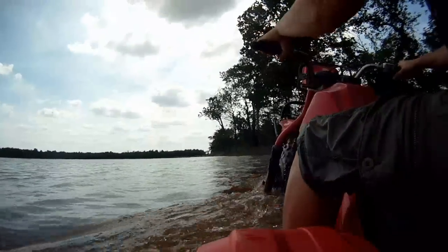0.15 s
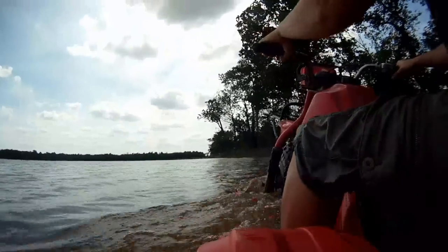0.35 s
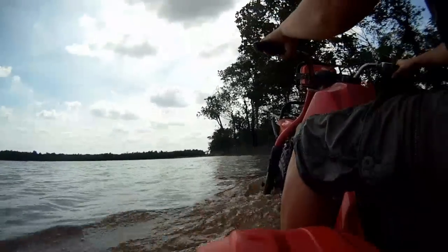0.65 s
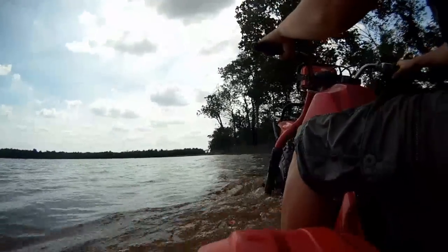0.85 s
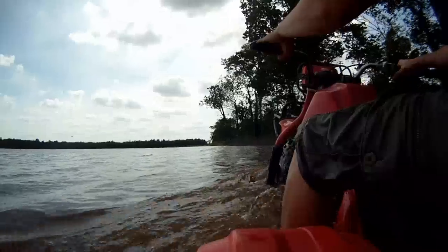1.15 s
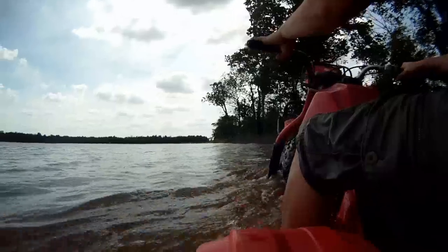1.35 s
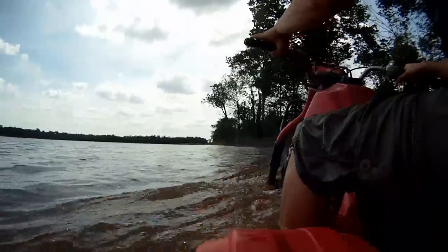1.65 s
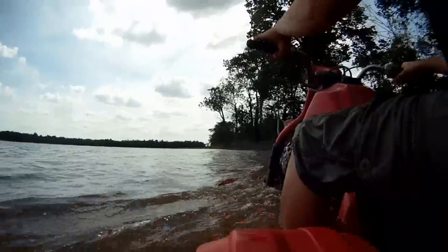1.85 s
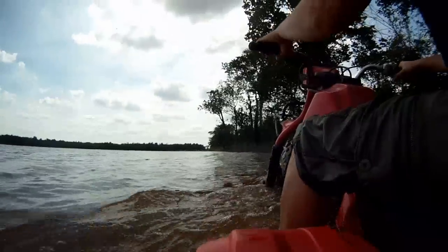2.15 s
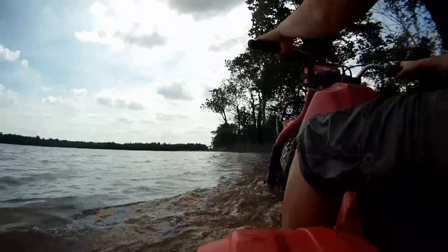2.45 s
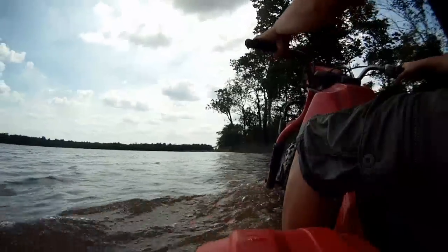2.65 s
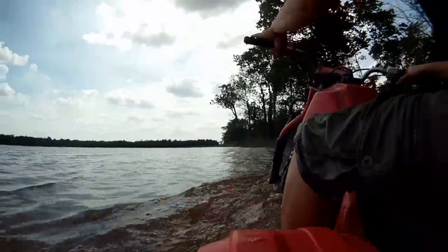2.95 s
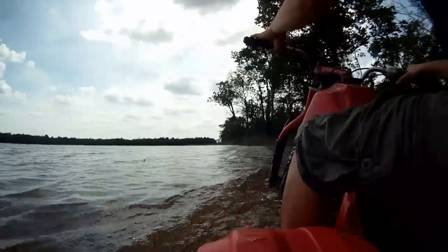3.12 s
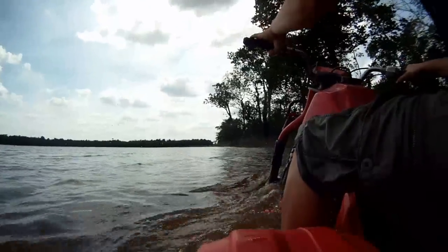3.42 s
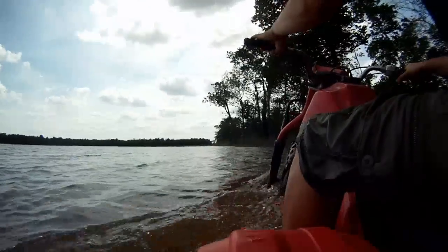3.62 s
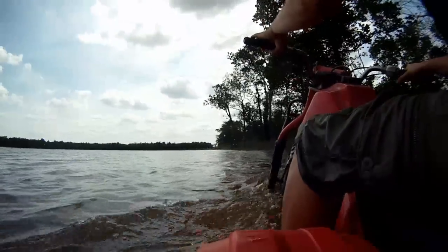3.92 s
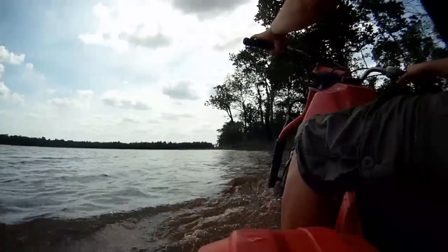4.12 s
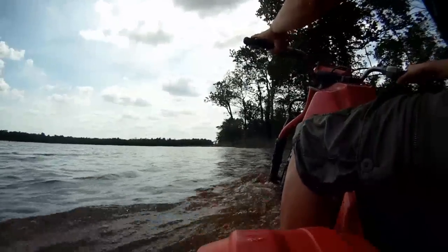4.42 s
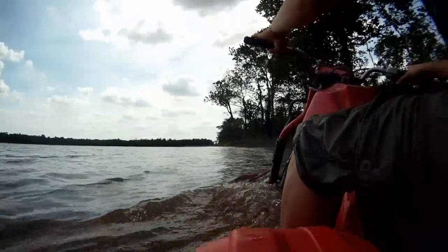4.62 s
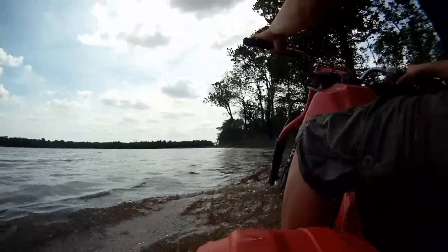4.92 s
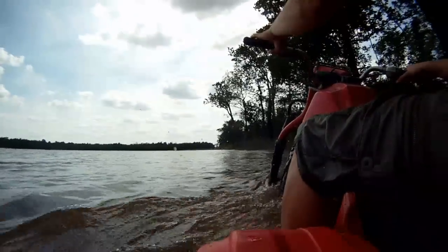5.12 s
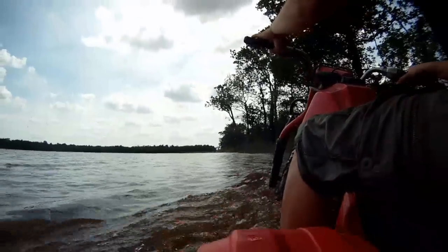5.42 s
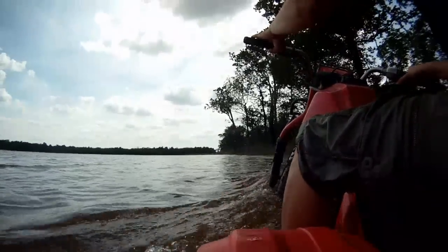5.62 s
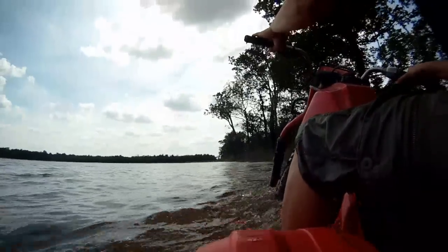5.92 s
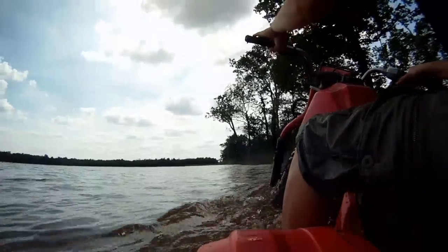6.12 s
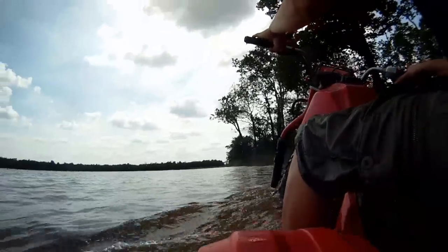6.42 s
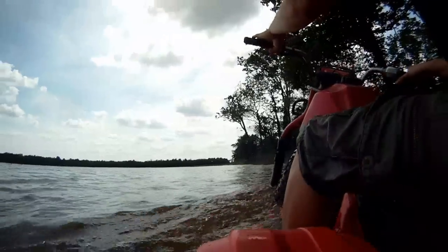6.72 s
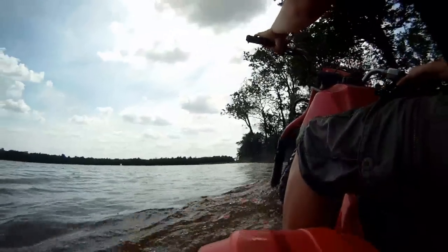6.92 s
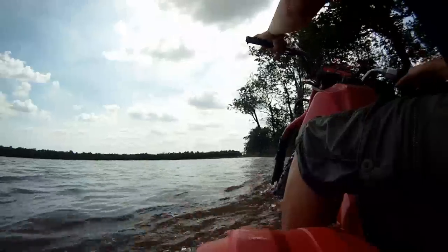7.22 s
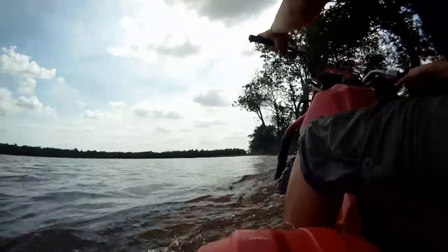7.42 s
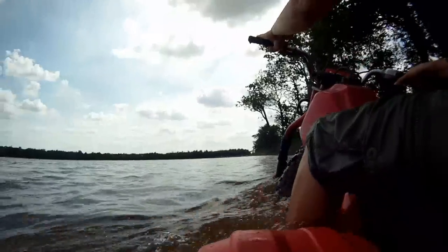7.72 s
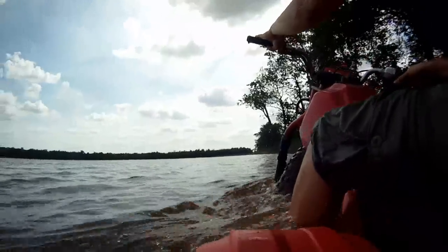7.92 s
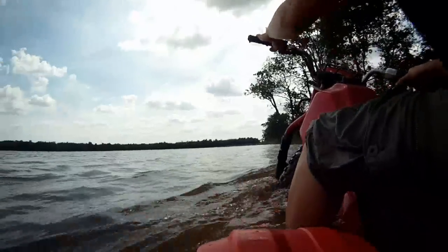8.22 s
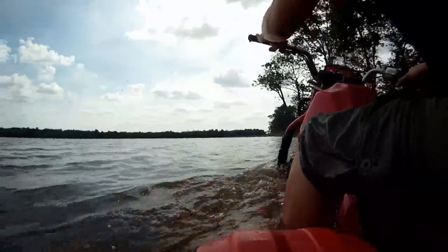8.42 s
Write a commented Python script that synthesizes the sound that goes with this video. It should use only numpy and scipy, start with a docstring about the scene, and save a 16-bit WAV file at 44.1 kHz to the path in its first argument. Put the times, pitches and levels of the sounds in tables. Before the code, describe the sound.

Close to the rear wheel of an all-terrain vehicle in open water, a small engine putters with a deep, gurgling exhaust. It runs fairly steadily, with short sags, chain rattles and a few light knocks. Softer bubbling, sloshing and a thin hiss of spray go on underneath. Towards the end the revs drop and the engine lugs, the water churns a little louder, and one sharp splat hits the fender.

```python
"""In deep water, at the rear fender of a wading three-wheeler. Its single-cylinder four-stroke engine
runs at low revs, stumbles now and then and lugs at the end. Periodic firing makes the exhaust throb,
meshing teeth whine, and impacts excite the modes of casing, crankcase and valve cover. Round the
wheels bubbles resonate, water hisses and drops patter. Coarse sampling adds a glassy fizz."""
import sys
import numpy as np
from scipy import signal
from scipy.fft import rfft, irfft, next_fast_len
from scipy.io import wavfile
from scipy.ndimage import uniform_filter1d, map_coordinates

SR = 44100
rng = np.random.default_rng(int(sys.argv[2]) if len(sys.argv) > 2 else 0)


def digitize_waveform(pressure):
    """Quantize a signal to 16-bit integers and store it at the path in sys.argv[1].

    Rows of a 2-D input are taken as channels; values are limited to [-1, 1].
    """
    field = np.atleast_2d(pressure).T
    bounded = np.clip(field, -1, 1)
    quanta = np.round(bounded * 32767).astype(np.int16)
    wavfile.write(sys.argv[1], SR, quanta)


N = 377496
TIME = np.arange(N) / SR

# Firing rate, one firing to an engine cycle: t/s, f/Hz
FIRING_RATE = [(0.0, 28.82), (0.15, 28.25), (0.36, 29.05), (0.5, 28.1), (0.62, 27.41), (0.9, 27.85),
               (1.25, 28.78), (1.5, 29.37), (1.75, 29.85), (1.95, 30.47), (2.15, 29.44), (2.42, 27.78),
               (2.72, 27.13), (2.9, 28.21), (3.03, 29.53), (3.15, 29.66), (3.35, 28.02), (3.62, 28.72),
               (4.0, 28.61), (4.15, 28.81), (4.35, 28.63), (4.55, 28.82), (4.9, 28.76), (5.1, 28.71),
               (5.45, 28.33), (5.75, 28.91), (5.95, 28.69), (6.25, 27.91), (6.55, 28.17), (6.8, 27.48),
               (7.05, 26.41), (7.35, 25.66), (7.6, 27.42), (7.75, 27.46), (8.0, 25.64), (8.2, 24.84),
               (8.38, 23.39), (8.56, 26.21)]
CRUISE_HZ, LUG_HZ = 28.5, 24.6  # the usual rate, and the rate below which the engine lugs
# Load of the water on the engine: t/s, level/dB
ENGINE_LOAD = [(0, -3.5), (1.9, -2), (2.45, -3.5), (3.25, 0), (4.3, 0), (5.4, -0.5), (6.2, -3.5),
               (7.5, -2.5), (8.56, -5)]
# Stumbles, in which the drone sags and the slack chain rattles: t/s, length/s, sag/dB, rattle/dB
STUMBLE_EVENTS = [(0.173, 0.17, 7, 4.5), (0.53, 0.078, 28.5, 1), (0.95, 0.23, 2, 2.5), (1.662, 0.09, 1, 4),
                  (2.39, 0.03, 12.5, 6.5), (2.738, 0.16, 19.5, 3.5), (2.93, 0.026, 10.5, -9.5),
                  (3.3, 0.3, 5.5, 3), (3.54, 0.082, 3, 3.5), (4.036, 0.081, 11.5, 2.5),
                  (4.225, 0.15, 10.5, 3), (5.03, 0.029, 4.5, 5.5), (5.47, 0.15, 8, 4),
                  (5.735, .1, 8.5, 2.5), (5.95, 0.037, 9.5, 3), (6.2, 0.13, 5, 3.5),
                  (6.32, 0.09, 18.5, 3.5), (6.7, 0.12, 3.5, 1.5), (6.887, 0.27, 4.5, 1.5),
                  (7.248, 0.54, 3, -0.4), (7.641, 0.07, 6, 2), (8.533, 0.1, 10, 7.5)]

# Gulp of each firing: order (multiple of the firing rate), level/dB
PUTTER_HARMONICS = [(3, -3), (6, -16)]
# Lugging boom: order, level/dB
BOOM_HARMONICS = [(5, 2), (9, -19)]
# Ringing of the pipe: order, level/dB
PIPE_HARMONICS = [(7, -12), (8, 1), (9, -17), (10, -16.5)]
# Envelope of that ringing at resonance: t/s, level/dB
PIPE_LEVEL = [(0, -34.5), (.25, -30), (.75, -31), (1.3, -31), (1.7, -28), (2.15, -31.5), (2.7, -32),
              (3.5, -29), (4.7, -30), (5.4, -27), (6.3, -31.5), (7.1, -33.5), (8.56, -29.5)]
# Brief dips in that ringing: t/s, length/s, depth/dB
PIPE_LEVEL_DIPS = [(.55, 0.11, 5), (.67, 0.037, 6), (1.95, 0.058, 8), (2.7, 0.16, 3), (3.14, .05, 5),
                   (4.77, 0.066, 29), (4.93, 0.058, 13), (5.82, 0.051, 9.5)]
MUFFLER_RESONANCE, PIPE_RESONANCE = (119.2, 5.5), (228, 11)  # f/Hz, bandwidth/Hz
# Spectrum of gas breaking through water: f/Hz, level/dB
BURBLE_SPECTRUM = [(12, -25), (28, 1.5), (60, -1), (125, 1.5), (170, -4), (240, -2.5), (300, -13.5),
                   (400, -26.5), (520, -24.5), (800, -37)]

# Response of the casing: f/Hz, level/dB
CASING_RESPONSE = [(300, -8), (520, -23.5), (585, -2), (690, -6.5), (745, -10), (880, 1), (1010, -7.5),
                   (1140, -18.5), (1350, -14.5), (1500, -24), (1680, -19.5), (1850, -29), (2600, -55)]
# Primary gear mesh and its neighbours: order, level/dB
MESH_TONES = [(41, -10.5), (42, 0), (43, -8.5), (46, -11), (47, -17.5), (48, -14.5), (59, -23), (63, -39),
              (67, -22)]
# Envelope of their whine: t/s, level/dB
WHINE_LEVEL = [(0, -45), (.65, -50), (1.0, -44.5), (1.55, -51), (2.0, -55), (2.3, -50), (2.65, -50),
               (2.98, -46.5), (3.12, -50), (3.3, -41), (4.3, -39.5), (5.4, -43), (5.8, -45.5), (6.55, -49),
               (7.1, -47), (7.6, -48), (8.56, -47)]
# Gearbox tones: order, level/dB
GEARBOX_TONES = [(11, -26.5), (12, -23.5), (13, -15), (15, -27.5), (16, -27.5), (27, -15), (30.1, -18),
                 (31.2, -3.5), (33, -12)]
# Envelope of the drive chain's hum: t/s, level/dB
CHAIN_LEVEL = [(0, -49), (.9, -42.5), (1.5, -43), (2.3, -45.5), (2.65, -39.5), (3.1, -39), (3.7, -42.5),
               (5.5, -43.5), (6, -45.5), (7.7, -44.5), (8.56, -49)]
# Piston slaps: phase/cycles, spread/cycles, level/dB
PISTON_IMPACTS = [(.24, .02, -1.5), (.34, .03, -5.5), (.545, .02, -1), (.61, .02, -4), (.74, .03, -2),
                  (.82, .025, 0), (.91, .02, -4)]
# Response of the crankcase: f/Hz, level/dB
CRANKCASE_RESPONSE = [(1200, -36), (1790, -25.5), (1910, 6), (2130, 6), (2350, -6), (2500, -6.5),
                      (2700, -33), (3200, -39), (4200, -60.5)]
# Tappet ticks: phase/cycles, spread/cycles, level/dB
VALVE_IMPACTS = [(.155, .014, -5.5), (.465, .025, -5.5), (.65, .024, 0), (.98, .04, -8)]
# Response of the valve cover: f/Hz, level/dB
COVER_RESPONSE = [(1500, -13.5), (2700, 5.5), (3200, -3.5), (3750, 15.5), (4150, 1), (4550, 11),
                  (5250, -2.5), (6000, -42.5)]
# Slaps of the slack cam chain: phase/cycles, spread/cycles, level/dB
CAM_CHAIN_IMPACTS = [(.46, .03, -2.5), (.97, .028, 0)]
# Response of the cam chain's tunnel: f/Hz, level/dB
TUNNEL_RESPONSE = [(1500, -14), (2400, 1), (3000, -5.5), (3600, 6.5), (4600, -3), (5300, -9.5),
                   (6000, -29.5)]
# Brief peaks in the clatter, a few of them sharp knocks: t/s, casing/dB, crankcase/dB, valve cover/dB
CLATTER_PEAKS = [(1.0161, -36, -36, -41), (1.3215, -22, -38, -48), (4.2705, -23, -31, -46),
                 (5.031, -21, -38, -48), (6.6003, -34, -27, -39), (7.1826, -21, -31, -44),
                 (7.5362, -34, -30.5, -50), (7.9055, -36, -37, -38), (7.9439, -38, -40, -37),
                 (8.1365, -30, -32, -38), (8.3005, -30, -26.5, -37)]
# Spell of piston knock under strain: t/s, length/s, level/dB
LABOUR_SPELLS = [(7.1, .7, -48)]

# Envelope of the bow wave breaking round the wheels: t/s, level/dB
WAKE_LEVEL = [(0, -41), (.6, -40.5), (1.3, -46.5), (2.2, -42), (2.75, -41), (3.35, -47), (4, -39.5),
              (5.4, -43), (6.2, -45.5), (7.2, -36), (7.55, -44), (8.1, -35.5), (8.56, -37)]
# Spectrum of the water's hiss: f/Hz, level/dB
WASH_SPECTRUM = [(300, 23.5), (900, -1.5), (1500, 7), (2600, -14), (4000, -8.5), (5500, -13.5),
                 (6500, -23.5)]
# Spectrum of fine drops landing: f/Hz, level/dB
SPRAY_SPECTRUM = [(1200, 2), (2500, 10), (3500, 3.5), (4800, -7), (5600, -20.5)]
# Spurts of spray off the tyres: t/s, length/s, level/dB
TYRE_SPURTS = [(.28, .08, -54), (.656, .015, -49), (.695, .02, -48.5), (2.89, .02, -49),
               (3.337, .025, -49.5), (6.72, .1, -54), (7.489, .03, -50), (7.615, .025, -48.5),
               (8.06, .02, -50), (8.179, .02, -49)]
# Spectrum of a spurt: f/Hz, level/dB
SPURT_SPECTRUM = [(1500, -7), (2600, -4), (3700, 0), (4800, 0), (5400, -4.5), (6000, -28)]
# Waves sloshing round the wheels: t/s, length/s, level/dB
SLOSH_EVENTS = [(0.595, 0.11, -31.5), (1.35, 0.086, -36.5), (2.036, 0.071, -35.5), (2.714, 0.074, -30),
                (3.08, 0.093, -37), (3.342, 0.08, -31.5), (3.496, 0.038, -31), (3.844, 0.13, -38),
                (5.156, 0.062, -38.5), (5.399, 0.14, -31.5), (6.938, 0.036, -29), (7.662, .11, -34.5)]
# Water thrown against the fender, a smack and its rebound: t/s, level/dB, f/Hz of its ring
FENDER_SPLATS = [(7.5303, -22.5, 3390), (7.5331, -39, 2470)]
# Modes of the fender: f/Hz, level/dB
FENDER_MODES = [(1375, -11), (1640, -10), (1920, -8), (2150, -6), (2470, -11), (2780, -14), (3020, -16)]


def amp(db):
    """Amplitude ratio of a level in decibels."""
    return 10 ** (np.asarray(db) / 20)


def unit_rms(x):
    """Normalises a signal to rms 1."""
    return x / np.sqrt(np.mean(x ** 2) + 1e-20)


def curve(rows):
    """Linear interpolation of (t/s, value) rows at every sample."""
    return np.interp(TIME, *np.transpose(rows))


def bump(s, length):
    """Gaussian pulse centred on time s; length is its full width at 1/e."""
    return np.exp(-np.minimum((2 * (TIME - s) / length) ** 2, 20))


def bumps_db(rows):
    """Sum of Gaussian pulses in decibels, for each level column of (t/s, length/s, level/dB, ...)."""
    return sum(np.outer(dbs, bump(s, length)) for s, length, *dbs in rows)


def swells(rows):
    """Amplitude envelope of Gaussian pulses, from (t/s, length/s, level/dB) rows."""
    return sum(amp(db) * bump(s, length) for s, length, db in rows)


def wander(rate):
    """Smooth random modulation of rms 1, changing about rate times a second."""
    knots = rng.standard_normal(4096)
    coarse = TIME[::32]
    spline = map_coordinates(knots, [coarse * rate], order=3, mode="wrap")
    return unit_rms(np.interp(TIME, coarse, spline))


def per_cycle(cycles):
    """Cycle-to-cycle variation: one random value a cycle, gliding to the next."""
    return np.interp(cycles, np.arange(512), rng.standard_normal(512))


def cyclic_noise(cycles):
    """Periodic noise: one random waveform repeats with every engine cycle."""
    return np.interp(cycles % 1, np.linspace(0, 1, 512), rng.standard_normal(512))


def grit(per_s):
    """Shot noise: tiny impacts of random size at random moments."""
    return unit_rms(rng.standard_normal(N) * (rng.random(N) < per_s / SR))


def bursts(cycles, impacts, steady_db, uneven_db):
    """Envelope of Gaussian bursts in every cycle over a steady floor; incoherent parts add in power."""
    power = amp(steady_db) ** 2
    for phase, spread, db in impacts:
        away = (cycles - phase + .5) % 1 - .5
        strength = amp(db + uneven_db * per_cycle(cycles))
        power = power + strength ** 2 * np.exp(-.5 * (away / spread) ** 2)
    return np.sqrt(power)


def blows(cycles, impacts, uneven_db):
    """Impulse train at set phases of every cycle, with random timing and strength."""
    force = np.zeros(N)
    starts = np.arange(256)
    for phase, spread, db in impacts:
        late, hard = rng.standard_normal((2, len(starts)))
        at = np.searchsorted(cycles, starts + phase + spread * late)
        heard = (at > 0) & (at < N)
        force[at[heard]] += amp(db + uneven_db * np.tanh(hard[heard]))
    return unit_rms(force)


def gulps(cycles, harmonics, phase, waver_db):
    """Fourier synthesis of a pressure dip at one phase of every cycle; each harmonic wavers."""
    angle = 2 * np.pi * (cycles - phase)
    partials = (amp(db + waver_db * wander(15)) * np.cos(order * angle) for order, db in harmonics)
    return -np.sqrt(2) * sum(partials)


def resonance_db(hz, resonance):
    """Lorentzian response of a resonator, 0 dB at its centre."""
    centre, width = resonance
    return -10 * np.log10(1 + (2 * (hz - centre) / width) ** 2)


def gain_at(hz, spectrum, outside_db):
    """Gain of a spectrum, its levels interpolated over log frequency."""
    f, db = np.transpose(spectrum)
    return amp(np.interp(np.log(hz + 1), np.log(f), db, left=outside_db, right=outside_db))


def filtered(x, gain):
    """Zero-phase filter: multiplies the spectrum by gain(f/Hz)."""
    size = next_fast_len(N + 4096)
    return irfft(rfft(x, size) * gain(np.fft.rfftfreq(size, 1 / SR)), size)[..., :N]


def coloured(x, spectrum):
    """Source and filter: shapes an excitation by a spectrum, at rms 1."""
    return unit_rms(filtered(x, lambda hz: gain_at(hz, spectrum, outside_db=-90)))


def impulse_response(body, size=2048):
    """Minimum-phase ringing of a body after one blow, at peak 1."""
    hz = np.fft.rfftfreq(size, 1 / SR)
    cepstrum = irfft(np.log(gain_at(hz, body, outside_db=-60)))
    ring = irfft(np.exp(rfft(2 * cepstrum[:size // 2], size)))
    return ring / abs(ring).max()


def struck(force, body):
    """Forced vibration: the force convolved with the body's impulse response, at rms 1."""
    return unit_rms(signal.oaconvolve(force, impulse_response(body))[:N])


def patchy(x, depth_db):
    """Selective fading: water shifts against the metal, so each narrow band swells and sinks alone."""
    bands = signal.stft(x, nperseg=2048)[2]
    fading = uniform_filter1d(rng.standard_normal(bands.shape), 3, axis=0)
    fading = unit_rms(uniform_filter1d(fading, 5, axis=1))
    return unit_rms(signal.istft(bands * amp(depth_db * fading), nperseg=2048)[1][:N])


def placed(x, left_db, scatter_db):
    """A level difference sets the direction; short scattering off water and machine adds width."""
    t = np.arange(3000) / SR
    echoes = rng.standard_normal(len(t)) * t * np.exp(-t / 0.0042)
    scatter = amp(scatter_db) * unit_rms(signal.oaconvolve(x, echoes)[:N]) * np.std(x)
    return np.array([x * amp(left_db / 2) + scatter, x * amp(-left_db / 2) - scatter])


def exhaust(cycles, firing_hz, load_db, sag_db, unrest):
    """Periodic forcing: the crank shakes the frame twice a cycle; firings drive muffler and pipe."""
    shake_db = -19.5 + .5 * load_db - 4.5 * np.maximum(LUG_HZ - firing_hz, 0)
    thump_db = -32.5 - 1.6 * load_db - .2 * sag_db
    putter_db = -24.5 - 0.075 * load_db
    chug_db = -34 - 1.7 * load_db + 0.24 * (CRUISE_HZ - firing_hz)
    drone_db = -21 + 0.1 * load_db - sag_db
    boom_db = -21 + 1.4 * resonance_db(5 * firing_hz, MUFFLER_RESONANCE)
    ring_db = curve(PIPE_LEVEL) + 0.59 * resonance_db(8 * firing_hz, PIPE_RESONANCE)
    ring_db -= bumps_db(PIPE_LEVEL_DIPS)[0]
    cycles = cycles + 0.0055 * unrest * per_cycle(cycles)  # timing jitter
    shake = amp(shake_db) * gulps(cycles, [(2, 0.0087)], phase=0.754, waver_db=0.93)
    thump = amp(thump_db) * gulps(cycles, [(1, 0)], phase=0.675, waver_db=1)
    putter = amp(putter_db) * gulps(cycles, PUTTER_HARMONICS, phase=0.66, waver_db=1.6)
    chug = amp(chug_db) * gulps(cycles, [(5, 0.002)], phase=0.6765, waver_db=0.95)
    drone = amp(drone_db) * gulps(cycles, [(4, 0)], phase=0.695, waver_db=1.43)
    boom = amp(boom_db) * gulps(cycles, BOOM_HARMONICS, phase=0.7294, waver_db=-4.5)
    ring = amp(ring_db) * gulps(cycles, PIPE_HARMONICS, phase=.73, waver_db=1.2)
    firing_strength = amp(1.55 * unrest * per_cycle(cycles))
    return shake + (thump + putter + chug + drone + boom + ring) * firing_strength


def burble(cycles):
    """Modulated noise: exhaust gas breaks through the water in one ragged puff per firing."""
    puffs = bursts(cycles, [(.68, .13, 0)], steady_db=-5, uneven_db=4)
    return coloured(puffs * rng.standard_normal(N), BURBLE_SPECTRUM)


def clatter(cycles):
    """Impact excitation: chain rollers and loose parts rattle the casing, partly in step with the cycle."""
    force = grit(4000) + amp(-9) * blows(cycles, [(.42, .05, 0), (.65, .03, -3)], uneven_db=3)
    rattle = struck(force, CASING_RESPONSE) + amp(-9) * coloured(cyclic_noise(cycles), CASING_RESPONSE)
    return unit_rms(patchy(rattle, depth_db=1.5) * amp(-0.37 * wander(14)))


def gears(cycles, tones, backlash_rad, flutter_db):
    """Teeth mesh at multiples of the engine speed; backlash modulates their phase and amplitude."""
    play = backlash_rad * wander(35)
    out = np.zeros(N)
    for order, db in tones:
        angle = 2 * np.pi * (order * cycles + rng.random()) + play
        out += amp(db + flutter_db * wander(22)) * np.sqrt(2) * np.cos(angle)
    return out


def piston(cycles):
    """Impact and friction: the piston slaps and rubs its bore, exciting the crankcase modes."""
    rub = bursts(cycles, PISTON_IMPACTS, steady_db=-3.5, uneven_db=2)
    force = amp(-4.5) * blows(cycles, PISTON_IMPACTS, uneven_db=2.5) + unit_rms(rub * grit(12000))
    repeating = amp(4) * struck(rub * cyclic_noise(cycles), CRANKCASE_RESPONSE)
    return unit_rms(struck(force, CRANKCASE_RESPONSE) + repeating)


def valves(cycles):
    """Impact excitation: tappets ring the valve cover four times a cycle."""
    rub = bursts(cycles, VALVE_IMPACTS, steady_db=-6, uneven_db=2) * grit(14000)
    taps = amp(-8) * blows(cycles, VALVE_IMPACTS, uneven_db=2.5)
    return struck(unit_rms(rub) + taps, COVER_RESPONSE)


def bubbles(low_hz, high_hz, per_s, decay_periods, glide, sizes=24):
    """Air pockets ring as damped oscillators, rising in pitch as they reach the surface."""
    out = np.zeros(N)
    t = np.arange(3000) / SR
    chance = per_s * amp(4.5 * wander(4)) / sizes / SR
    for hz in np.geomspace(low_hz, high_hz, sizes):
        age = t * hz / decay_periods
        angle = 2 * np.pi * np.cumsum(hz * (1 + glide * np.tanh(age))) / SR
        ring = (1 - np.exp(-t * hz)) * np.exp(-age) * np.sin(angle)
        draw = rng.random(N)
        for at in np.flatnonzero(draw < chance):
            level_db = 3 * min(-np.log(draw[at] / chance[at]), 3)  # loud bubbles are rare
            part = out[at:at + len(t)]
            part += amp(level_db) * ring[:len(part)]
    return unit_rms(out)


def wash(slowing_hz):
    """Broadband noise: the water's hiss surges, and grows as deeper water slows the engine."""
    level_db = -59 + 0.63 * slowing_hz + 1.8 * wander(23)
    return amp(level_db) * coloured(rng.standard_normal(N), WASH_SPECTRUM)


def spray(slowing_hz):
    """Shot noise of fine drops: a clumped patter, louder as the engine slows, and spurts off the tyres."""
    patter_db = -60.5 + .9 * slowing_hz + 2.2 * wander(9) + 1.8 * wander(50)
    patter = amp(patter_db) * coloured(grit(2500), SPRAY_SPECTRUM)
    return patter + swells(TYRE_SPURTS) * coloured(grit(6000), SPURT_SPECTRUM)


def cam_chain(cycles, slowing_hz, lead_per_hz=.04):
    """Friction: as revs drop the slack chain scrapes its tunnel in bursts, ever earlier in the cycle."""
    slack = np.clip(slowing_hz / 2, 0, 1)
    scrapes = bursts(cycles + lead_per_hz * slowing_hz, CAM_CHAIN_IMPACTS, steady_db=-14, uneven_db=2.5)
    return amp(-57) * slack * struck(scrapes * grit(9000), TUNNEL_RESPONSE)


def sloshes():
    """Air entrainment: a wheel folds a wave over, and a dense cloud of bubbles swells and dies."""
    return swells(SLOSH_EVENTS) * bubbles(590, 1000, per_s=900, decay_periods=9, glide=.06)


def clatter_peaks():
    """Decaying transients: brief louder peaks in the engine's clatter, and a few sharp knocks."""
    out = np.zeros(N)
    bodies = (CASING_RESPONSE, CRANKCASE_RESPONSE, COVER_RESPONSE)
    rings = np.array([impulse_response(body) for body in bodies])
    for s, *dbs in CLATTER_PEAKS:
        part = out[round(s * SR):][:rings.shape[1]]
        part += (amp(dbs) @ rings)[:len(part)]
    return out


def labour(cycles):
    """Periodic impact: under strain the piston knocks the crankcase once per firing."""
    force = blows(cycles, [(.605, .01, 0)], uneven_db=3)
    return swells(LABOUR_SPELLS) * struck(force, CRANKCASE_RESPONSE)


def splats(decay_s=.0022):
    """Damped modes: single drops smack the plastic fender, which rings for a moment."""
    out = np.zeros(N)
    t = np.arange(1200) / SR
    band = signal.butter(2, [1100, 6000], "band", fs=SR, output="sos")
    smack = signal.sosfilt(band, signal.unit_impulse(len(t)))
    smack = amp(5.5) * smack / abs(smack).max()
    fender = sum(amp(db) * np.sin(2 * np.pi * hz * t) for hz, db in FENDER_MODES)
    for s, db, hz in FENDER_SPLATS:
        modes = amp(-5.5) * np.sin(2 * np.pi * hz * t) + fender
        part = out[round(s * SR):][:len(t)]
        part += amp(db) * (smack + modes * np.exp(-t / decay_s))[:len(part)]
    return out


def scene():
    """Superposition of water and engine, whose parts share one crank angle, load and set of stumbles."""
    firing_hz, load_db = curve(FIRING_RATE), curve(ENGINE_LOAD)
    sag_db, rattle_db = bumps_db(STUMBLE_EVENTS)
    slowing_hz = CRUISE_HZ - firing_hz
    cycles = np.cumsum(firing_hz) / SR
    shaft = cycles + 0.0041 * wander(7)  # the drive train twists back and forth
    unrest = .85 + .14 * np.maximum(rattle_db, 0)  # firing is less even in a stumble
    throb = exhaust(cycles, firing_hz, load_db, sag_db, unrest)
    gas = amp(-31 + 0.41 * rattle_db + 0.24 * load_db + .15 * slowing_hz) * burble(cycles)
    casing = amp(-33.5 + 0.57 * load_db + rattle_db) * clatter(shaft)
    backlash_rad = .42 + .09 * np.maximum(-load_db, 0)  # more play under a light load
    whine_db = curve(WHINE_LEVEL) + .8 * wander(9)
    whine = amp(whine_db) * gears(shaft, MESH_TONES, backlash_rad, flutter_db=2.2)
    gearbox = amp(-34.5 + 1.53 * load_db) * gears(shaft, GEARBOX_TONES, backlash_rad=.36, flutter_db=3.5)
    chain = amp(curve(CHAIN_LEVEL)) * gears(shaft, [(23.4, 0)], backlash_rad=.5, flutter_db=2.5)
    piston_db = -40.5 + 0.8 * load_db + 0.83 * rattle_db
    crankcase = amp(piston_db) * piston(cycles) + labour(cycles) + clatter_peaks()
    valve_db = -54.2 + .5 * load_db + .3 * rattle_db + 1.5 * wander(11)
    ticks = amp(valve_db) * valves(cycles) + cam_chain(cycles, slowing_hz)
    churn = amp(curve(WAKE_LEVEL)) * bubbles(735, 1066, per_s=450, decay_periods=11, glide=0.063)
    hiss = wash(slowing_hz)
    out = placed(throb, left_db=0, scatter_db=-41) + placed(gas, left_db=0, scatter_db=-21)
    out += placed(casing + whine + gearbox + chain + churn + sloshes(), left_db=-.8, scatter_db=-24)
    out += placed(crankcase, left_db=-1.2, scatter_db=-21)
    out += placed(ticks + splats(), left_db=-.5, scatter_db=-12)
    return out + placed(spray(slowing_hz) + hiss, left_db=0, scatter_db=-4)


def record(dry):
    """Spectral imaging: holding each coarse sample mirrors the sound about the sampling rate."""
    hold_hz, input_edge_hz, output_edge_hz = 12000, 5720, 14450
    narrow = signal.oaconvolve(dry, signal.firwin(301, input_edge_hz, fs=SR)[None], "same")
    sampled = narrow * (1 + 2 * np.cos(2 * np.pi * hold_hz * TIME))
    held = filtered(sampled, lambda hz: np.sinc(hz / hold_hz))
    lowpass = signal.firwin(511, output_edge_hz, window=("kaiser", 9), fs=SR)
    return signal.oaconvolve(held, lowpass[None], "same")


dry = scene()
out = record(dry)
digitize_waveform(out)
```